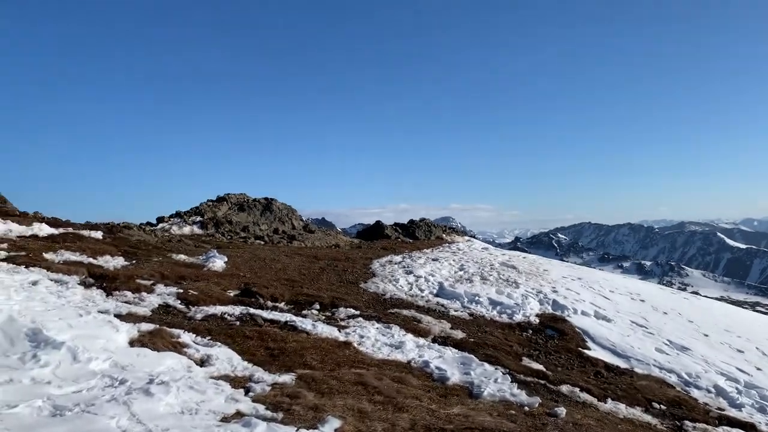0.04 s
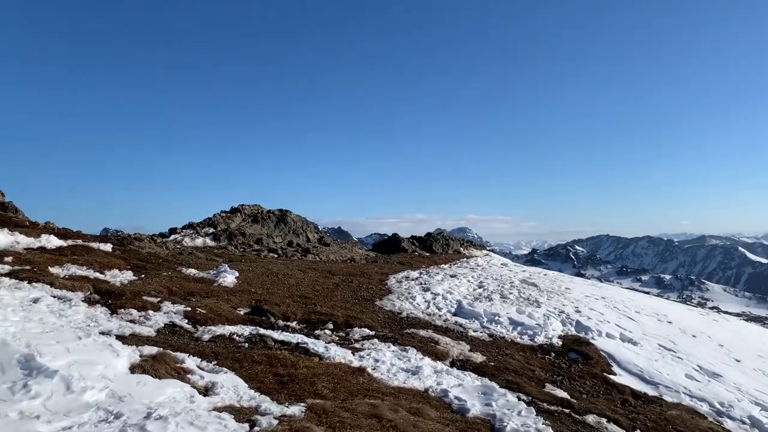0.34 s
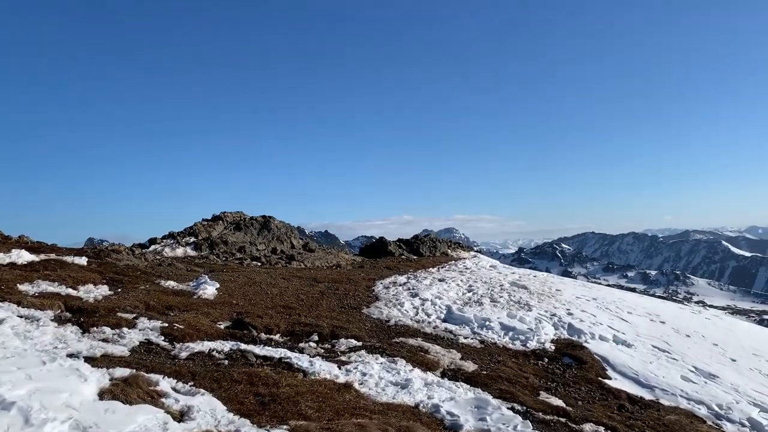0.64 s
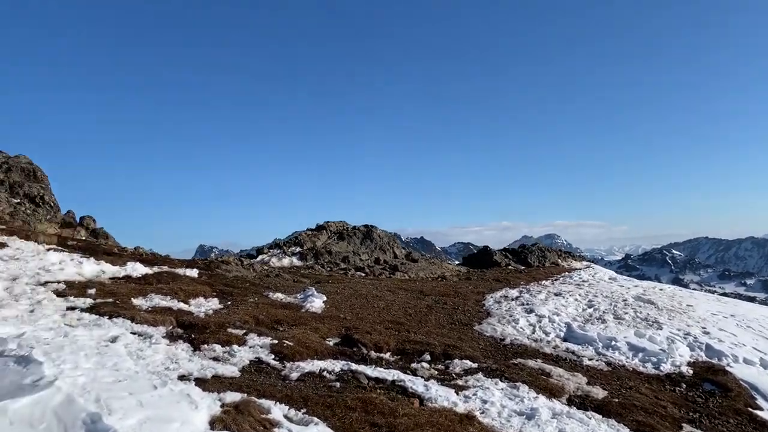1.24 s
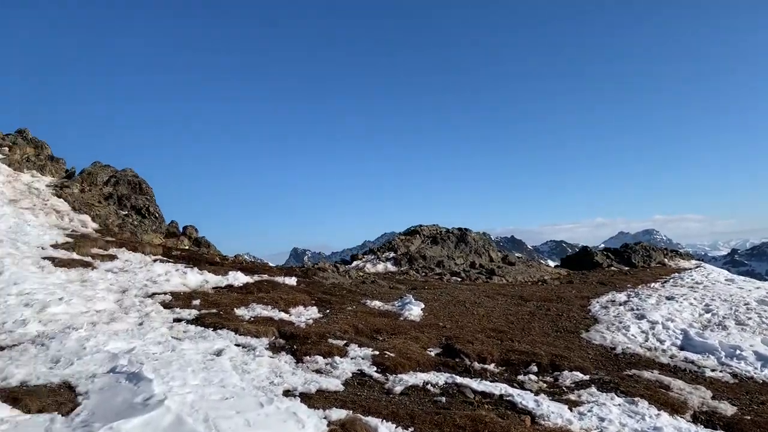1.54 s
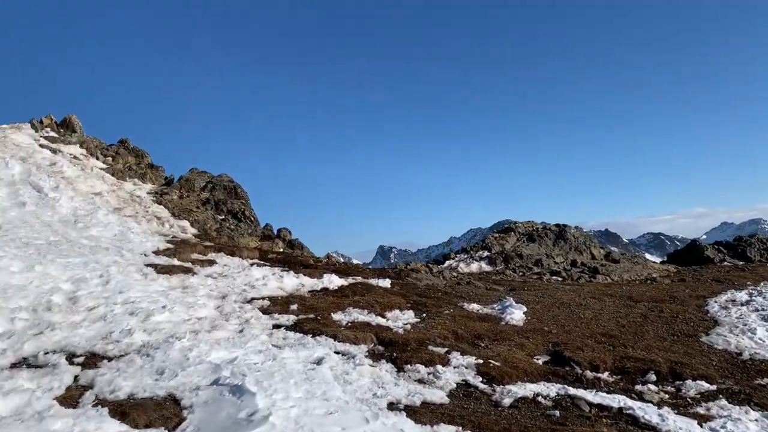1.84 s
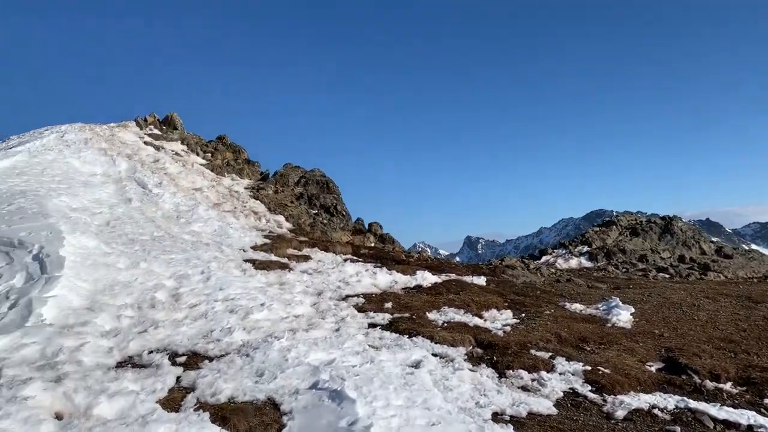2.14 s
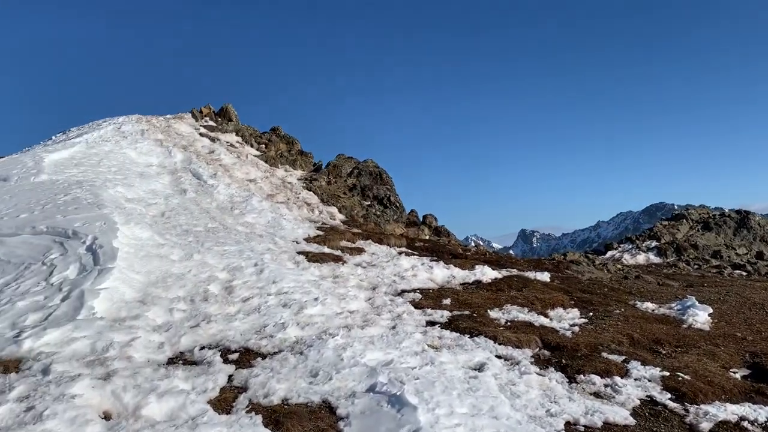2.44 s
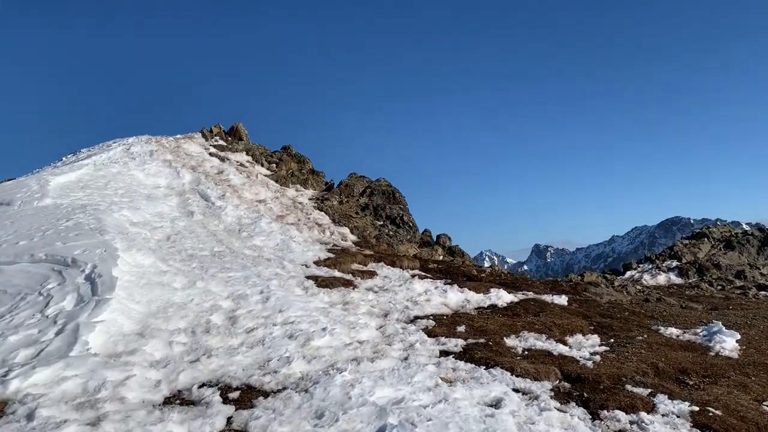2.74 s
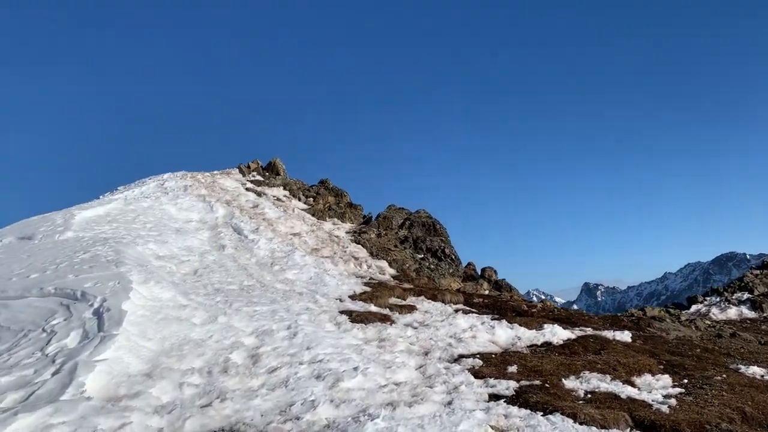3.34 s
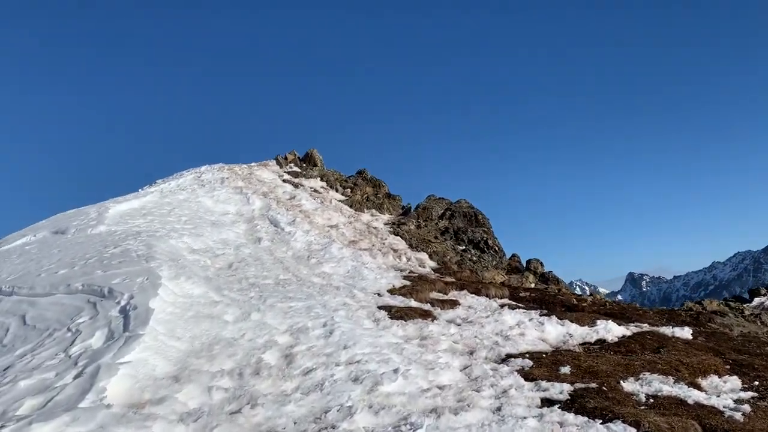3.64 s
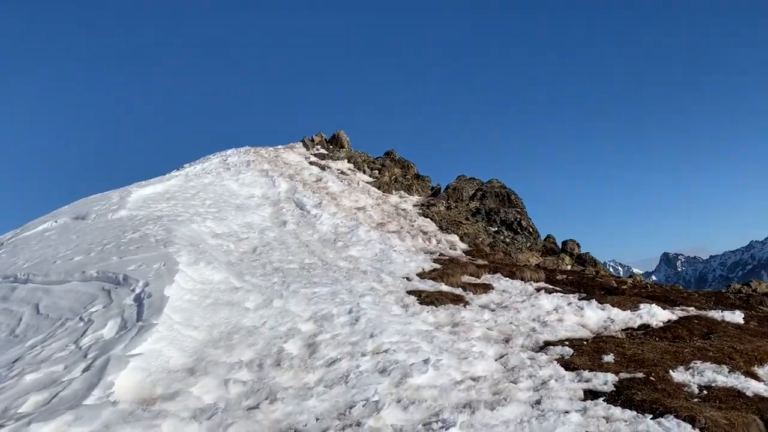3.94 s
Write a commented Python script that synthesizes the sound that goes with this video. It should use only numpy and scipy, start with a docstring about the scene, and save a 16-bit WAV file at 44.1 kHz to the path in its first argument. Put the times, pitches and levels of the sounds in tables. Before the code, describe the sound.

Gusty wind rumbles and thumps on the microphone, easing between bursts to a faint swish.

```python
"""Wind gusts buffet a hand-held microphone on an open summit. Eddies (swirls of air) at its two
openings, the ports, rumble in the lulls and turn bright and ragged as the wind rises; single
eddies strike as small bumps. Between the gusts comes a faint swishing hiss, probably a jacket
as its wearer turns, with a few light ticks."""
import sys
import numpy as np
from scipy import signal
from scipy.fft import rfft, irfft
from scipy.io import wavfile
from scipy.ndimage import uniform_filter1d, minimum_filter1d

SR = 44100
rng = np.random.default_rng(int(sys.argv[2]) if len(sys.argv) > 2 else 0)


def int16_out(signal):
    """Quantize to a 16-bit WAV file."""
    q = np.round(np.clip(np.atleast_2d(signal).T, -1, 1) * 32767)
    wavfile.write(sys.argv[1], SR, q.astype(np.int16))


N = 176400  # 4 seconds
FULL_GUST_DB, WINDWARD_DB = -16, 2.5  # wind level of a full gust; extra treble at the left port

# how hard the wind blows: t/s, level/dB
WIND_STRENGTH = [(0, -25.5), (0.03, -16), (0.07, -22), (0.11, -12.5), (0.14, -20.5), (0.17, -13.5),
                 (0.22, -14), (0.255, -21.5), (0.275, -16.5), (0.335, -18), (0.355, -13), (0.41, -22),
                 (0.445, -23), (0.495, -23.5), (0.52, -16), (0.57, -30.5), (0.587, -13), (0.66, -16.5),
                 (0.72, -26.5), (0.8, -39), (0.85, -34.5), (0.9, -45.5), (0.98, -44), (1.02, -54),
                 (1.14, -43), (1.3, -77), (1.55, -65), (1.63, -35.5), (1.652, -15), (1.7, -16),
                 (1.745, -16), (1.795, -22), (1.82, -12.5), (1.93, -9.5), (1.99, -15.5), (2.08, -13.5),
                 (2.13, -19.5), (2.165, -25), (2.25, -29), (2.35, -37.5), (2.475, -45.5), (2.497, -30),
                 (2.54, -38.5), (2.66, -46.5), (2.75, -34), (2.77, -21.5), (2.81, -26.5), (2.85, -37),
                 (2.9, -28.5), (2.97, -40.5), (3.11, -40.5), (3.15, -32), (3.23, -37), (3.37, -38.5),
                 (3.405, -14.5), (3.45, -24.5), (3.5, -47), (3.6, -56), (3.645, -41.5), (3.7, -61),
                 (3.74, -45), (3.775, -28), (3.83, -36.5), (3.878, -21.5), (3.915, -31.5), (3.95, -45),
                 (4.0, -33.5)]
# tone of a full gust: f/Hz, relative level/dB
GUST_TONE = [(15, -35), (25, -18.5), (98, 2.5), (377, -6.5), (839, -15), (954, -18), (1140, -16),
             (1970, -28.5), (3660, -52), (5530, -71), (7350, -64), (8360, -67), (12000, -71), (15600, -101),
             (22000, -120)]
# how fast each band grows with the wind: f/Hz, growth/(dB per dB)
BAND_GROWTH = [(120, 0.6641), (300, 0.78), (700, 1.0), (1400, 1.45), (2800, 2.07), (8000, 1.5)]
# how alike the wind is at the two ports: f/Hz, correlation (1 = the same)
PORT_LIKENESS = [(100, 0.89), (280, 0.95), (500, 0.82), (800, 0.57), (1300, -0.22), (3000, 0.17)]
def buffeting():
    """Swirling air hits the ports; the treble grows fastest with the wind and comes in short bursts."""
    eddy_rate, flutter_rate = 320, 40  # changes per second
    eddy_db, flutter_db, band_flutter_db = 3.5, 2.0, 2.4
    f, force_db = frequencies(), curve(WIND_STRENGTH) - FULL_GUST_DB
    flow = rfft(noise(colour(GUST_TONE), at_hz(PORT_LIKENESS, f)))
    flutter = flutter_db * wander(flutter_rate)
    shared_eddies = wander(eddy_rate)
    port_eddies = np.array([wander(eddy_rate), wander(eddy_rate)])
    out = 0
    for hz in 125 * 2. ** np.arange(-.5, 6.1, .5):  # bands half an octave apart
        octaves_away = abs(np.log2(np.maximum(f, 1) / hz))
        band = irfft(flow * np.maximum(1 - 2 * octaves_away, 0), N)
        growth = at_hz(BAND_GROWTH, hz)
        treble = hz ** 2 / (hz ** 2 + 1350 ** 2)  # 0 for low bands, 1 for high ones
        eddies = np.sqrt(1 - treble / 2) * shared_eddies + np.sqrt(treble / 2) * port_eddies
        bursts = flicker(growth * (flutter + eddy_db * eddies) + band_flutter_db * wander(flutter_rate))
        out = out + band * gain(growth * force_db + lean_left(treble * WINDWARD_DB)) * bursts
    return out * gain(-10.5)


# how loud the deep rumble is: t/s, relative level/dB
RUMBLE_LEVEL = [(0, -11), (0.1, -14.5), (0.3, -16.5), (0.4, -17.5), (0.5, -22), (0.63, -11), (0.75, -24),
                (0.85, -26), (0.92, -31.5), (1.1, -36.5), (1.16, -32), (1.25, -40), (1.36, -47.5),
                (1.55, -37), (1.62, -39), (1.67, -13), (1.78, -24), (1.95, -14), (2.12, -19.5),
                (2.2, -19.6), (2.42, -26.5), (2.55, -25.5), (2.7, -25.5), (2.78, -21), (2.95, -27),
                (3.1, -33), (3.17, -23), (3.3, -29), (3.4, -20.5), (3.5, -21.5), (3.6, -34.5), (3.7, -31.5),
                (3.8, -27.5), (3.92, -21.5), (4.0, -27)]
# tone of the rumble: f/Hz, relative level/dB
RUMBLE_TONE = [(12, 11), (25, 5.5), (65, 15), (110, -2.5), (170, -27.5), (300, -39), (1000, -100)]
def rumble(steady_s=0.076):
    """Large, slow eddies press on both ports almost alike."""
    swell = noise(colour(RUMBLE_TONE), likeness=0.95)
    power = uniform_filter1d(np.mean(swell ** 2, axis=0), size=int(steady_s * SR))
    return swell / np.sqrt(power) * gain(curve(RUMBLE_LEVEL) - 0.5)


# when the airflow tears at the port edges: t/s, length/s, relative level/dB
FLOW_TEARS = [(0.004, 0.23, -33), (0.257, 0.061, -27.5), (0.343, .045, -36.5), (0.505, 0.0089, -32.5),
              (0.578, 0.095, -31), (1.65, 0.052, -33.5), (1.812, 0.157, -27), (1.999, 0.034, -24.5),
              (2.055, 0.037, -27), (2.762, 0.014, -52.5), (3.383, .025, -42.5)]
# tone of the rasp: f/Hz, relative level/dB
RASP_TONE = [(400, -29), (1000, 7.5), (2000, 9.5), (4200, -6), (5800, -23), (10000, -47), (14000, -55)]
def tearing_air(spikes_per_s=700, spread_db=8, edge_s=0.0048):
    """Where the flow tears, tiny eddies break at each port as a rasp of sharp pressure spikes."""
    t, tearing = np.arange(N) / SR, 0
    for start, length, db in FLOW_TEARS:
        inside_s = np.minimum(t - start, start + length - t)
        tearing = tearing + gain(db) * np.clip(inside_s / edge_s + .5, 0, 1)
    size = gain(spread_db * np.clip(rng.standard_normal((2, N)), -2, 2))
    push_or_pull = np.sign(rng.standard_normal((2, N)))
    spikes = size * push_or_pull * (rng.random((2, N)) < spikes_per_s / SR)
    rasp = irfft(rfft(spikes / spikes.std()) * colour(RASP_TONE), N)
    return rasp * tearing * gain(lean_left(WINDWARD_DB) - 0.5)


# single eddies striking: t/s, peak level/dB, f/Hz
LONE_EDDIES = [(0.27, -11, 1150), (0.377, -7, 670), (0.445, -2, 214), (0.514, -6, 694), (0.585, -9, 710),
               (0.771, -17, 377), (0.833, -20.5, 473), (0.924, -28.5, 298), (0.975, -18.5, 444),
               (1.154, -23.5, 113), (1.385, -34.5, 200), (1.646, -5, 468), (2.126, -6.5, 116.5),
               (2.494, -18, 330), (2.56, -19.5, 416), (2.772, -17, 940), (2.826, -14, 506),
               (2.875, -19.5, 577), (2.955, -18.5, 770), (3.005, -18, 505), (3.141, -19, 446),
               (3.404, -9.5, 1280), (3.443, -14.5, 437), (3.642, -19, 550), (3.856, -13, 550),
               (3.877, -8.5, 500)]
def eddy_bumps(rise_cycles=1.177, width_octaves=0.58, roughness=0.59):
    """Each lone eddy is a ragged swing of air pressure, a few cycles long."""
    size = 4096  # samples per bump
    t, f = np.arange(size) / SR, np.arange(1, size // 2 + 2) * SR / size
    out = np.zeros((2, N + size))
    for start, db, hz in LONE_EDDIES:
        age = t * hz / rise_cycles
        near_pitch = np.exp(-.5 * (np.log2(f / hz) / width_octaves) ** 2)
        ragged = irfft(rfft(rng.standard_normal((2, size))) * near_pitch)
        swing = np.sin(2 * np.pi * (hz * t + rng.random()))
        puff = (swing + roughness * ragged / ragged.std()) * age ** 2 * np.exp(-2 * age)
        first = max(int((start - rise_cycles / hz / 2) * SR), 0)
        out[:, first:first + size] += puff / abs(puff).max() * gain(db)
    return out[:, :N]


# how loud the cloth swishes: t/s, relative level/dB
SWISH_LEVEL = [(0, -29.5), (0.04, -33.5), (0.07, -27), (0.19, -35), (0.3, -42), (0.37, -47), (0.41, -43),
               (0.44, -49.5), (0.51, -40), (0.56, -56.5), (0.625, -31.5), (0.66, -47.5), (0.75, -46.5),
               (0.9, -60.5), (1.03, -62.5), (1.08, -48.5), (1.145, -48), (1.165, -40), (1.31, -43),
               (1.38, -58.5), (1.47, -47.5), (1.74, -53.5), (1.77, -39.5), (1.8, -50), (1.9, -46.5),
               (2.05, -52), (2.29, -60), (2.33, -45.5), (2.45, -54.5), (2.5, -47), (2.56, -53),
               (2.63, -69.5), (2.82, -62), (2.91, -45), (2.955, -50), (3.0, -43), (3.13, -47), (3.25, -59),
               (3.43, -52), (3.47, -37), (3.5, -50.5), (3.7, -62.5), (3.88, -55), (4.0, -48.5)]
# how much louder the swish is on the right: f/Hz, level/dB
SWISH_ON_RIGHT = [(1000, 8.5), (6000, -1.5), (7800, -2), (8100, 7), (10000, 12), (12000, 0.5)]
# brisk flicks and firmer, lower scrapes: t/s, length/s, level/dB
CLOTH_FLICKS = [(0.048, 0.18, -43), (0.392, 0.031, -48), (0.46, 0.04, -50), (0.61, 0.019, -43),
                (1.156, 0.026, -47), (1.757, .025, -47), (1.835, 0.093, -60), (2.318, 0.027, -52),
                (2.482, 0.018, -58), (2.535, 0.017, -51), (2.895, .05, -55), (2.975, 0.095, -51),
                (3.457, .025, -56)]
CLOTH_SCRAPES = [(1.155, .18, -38), (3.452, 0.055, -35.5), (3.525, 0.053, -44.5), (3.605, 0.025, -56)]
# tones of the swish, flicks and scrapes: f/Hz, relative level/dB
SWISH_TONE = [(400, -27), (1000, 2), (1900, 1), (2900, -1.5), (4000, -7.5), (5600, -5.5), (7400, -16.5),
              (7900, -5.5), (8250, -2), (9800, -11.5), (11800, -23), (13800, -15.5), (15500, -23.5)]
FLICK_TONE = [(3000, -14), (6000, -5), (9500, 3), (11800, -3), (13800, 0), (15500, -3)]
SCRAPE_TONE = [(350, -7), (700, -4), (1150, 2), (1600, -8), (2500, -6.5), (4000, -30), (8000, -35)]
def cloth(creases_per_s=33, crease_s=.0012, grain_db=1.5):
    """Moving cloth swishes, sizzles and scrapes; tiny creases give way and briefly lift the swish."""
    sides = gain(lean_left(-at_hz(SWISH_ON_RIGHT, frequencies())))
    swish = noise(colour(SWISH_TONE) * sides, likeness=.12) * gain(curve(SWISH_LEVEL) - 4)
    flicks = noise(colour(FLICK_TONE), likeness=0.16)
    flicks *= strokes(CLOTH_FLICKS, rise_s=.008, release_s=.025, sag_db=2.5)
    scrapes = noise(colour(SCRAPE_TONE), likeness=0.74)
    scrapes *= strokes(CLOTH_SCRAPES, rise_s=.0032, release_s=.016, sag_db=16.5)
    kicks = (rng.random(N) < creases_per_s / SR) * rng.random(N)
    creases = signal.lfilter([1], [1, -np.exp(-1 / (crease_s * SR))], kicks)  # each kick dies away
    return (swish * (1 + gain(4) * creases) + flicks + scrapes) * flicker(grain_db * wander(rate=110))


# light ticks: t/s, level/dB
LIGHT_TICKS = [(0.977, -53), (1.295, -40), (1.511, -40.5), (1.536, -36), (1.57, -41.5), (3.759, -54),
               (3.928, -29.5)]
# tone of a tick: f/Hz, relative level/dB
TICK_TONE = [(800, -12), (2000, 1.5), (5000, -2), (7200, -5), (9000, -7), (13000, -32)]
def ticks(decay_s=0.0016):
    """Tiny dry clicks close to the microphone, a little to the right."""
    t = np.arange(N) / SR
    hits = sum(gain(db) * (t >= start) * np.exp(-abs(t - start) / decay_s) for start, db in LIGHT_TICKS)
    return noise(colour(TICK_TONE), likeness=0.16) * hits * np.array([[.7], [1]])


# tone of still air: f/Hz, relative level/dB
AIR_TONE = [(60, 37.5), (400, -9.5), (1500, -25), (5000, -27.5), (9000, -36.5), (12000, -52)]
def still_air(level_db=-53.5):
    """A faint, low, steady hush lies behind everything."""
    return noise(colour(AIR_TONE), likeness=.3) * gain(level_db)


def gain(db):
    """Turn decibels into a number to multiply by."""
    return 10 ** (np.asarray(db) / 20)


def lean_left(db):
    """Left and right levels in dB, with the left higher by db."""
    return db / 2 * np.array([[1], [-1]])


def at_hz(table, hz):
    """Read an (f, value) table, sliding between rows by octaves."""
    rows = np.array(table, float)
    return np.interp(np.log(np.maximum(hz, 1)), np.log(rows[:, 0]), rows[:, 1])


def curve(table):
    """Read a (t, value) table at every sample."""
    return np.interp(np.arange(N) / SR, *np.array(table, float).T)


def frequencies():
    """Every frequency in the sound, in Hz."""
    return np.arange(N // 2 + 1) * SR / N


def colour(table):
    """Gains that give plain noise this tone but keep its power."""
    f = frequencies()
    shape = gain(at_hz(table, f)) * np.minimum(f / 10, 1)
    return shape / np.sqrt(np.mean(shape ** 2))


def noise(tone, likeness):
    """Left and right noise; likeness 1 makes them the same, 0 unrelated."""
    mid, side = rfft(rng.standard_normal((2, N)))
    mid, side = mid * np.sqrt((1 + likeness) / 2), side * np.sqrt((1 - likeness) / 2)
    return irfft(np.array([mid + side, mid - side]) * tone, N)


def wander(rate):
    """A smooth random wiggle of typical size 1 that changes about rate times a second."""
    f = np.arange(int(2 * rate * N / SR)) * SR / N
    chance = rng.standard_normal((8192, 2))[:len(f)]
    speeds = np.exp(-(2 * f / rate) ** 2) * (f > rate / 10)
    wiggle = irfft((chance[:, 0] + 1j * chance[:, 1]) * speeds, N)
    return wiggle / wiggle.std()


def flicker(db):
    """Turn a wandering level into a gain of average power 1, its extremes softened."""
    wobble = gain(10 * np.tanh(db / 10))
    return wobble / np.sqrt(np.mean(wobble ** 2))


def strokes(table, rise_s, release_s, sag_db):
    """Loudness of (t, length, level) rows: each rises, sags and lets go."""
    t, out = np.arange(N) / SR, 0
    for start, length, db in table:
        gate = np.clip((t - start) / rise_s, 0, 1) * np.clip((start + length - t) / release_s + .5, 0, 1)
        out = out + gate * gain(db - sag_db * np.clip((t - start) / length, 0, 1))
    return out


def scene():
    """Wind, cloth and ticks over still air; no echoes in the open."""
    air = still_air()
    return buffeting() + rumble() + tearing_air() + eddy_bumps() + cloth() + ticks() + air


def record(dry, top_hz=15500, fade_s=.006):
    """Turn down peaks that pass full scale, fade both ends and cut the highest treble."""
    allowed = 1 / np.maximum(abs(dry).max(axis=0), 1)
    limiter = uniform_filter1d(minimum_filter1d(allowed, size=221), size=221)
    fade = np.minimum(np.arange(N) / SR / fade_s, 1)
    treble_cut = signal.ellip(10, .2, 80, top_hz, fs=SR, output="sos")
    return signal.sosfilt(treble_cut, dry * limiter * fade * fade[::-1])


dry = scene()
out = record(dry)
int16_out(out)
```